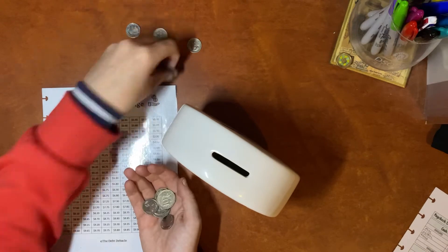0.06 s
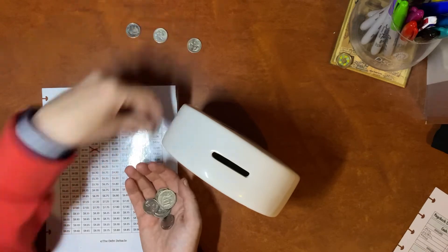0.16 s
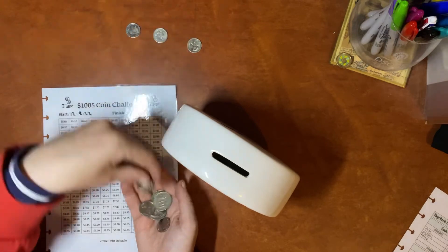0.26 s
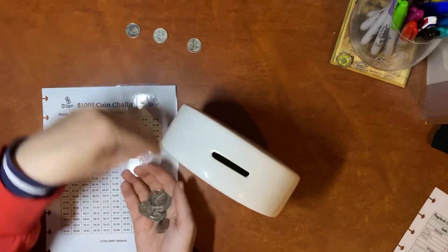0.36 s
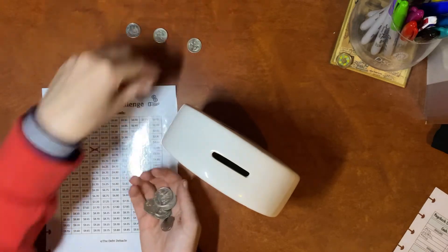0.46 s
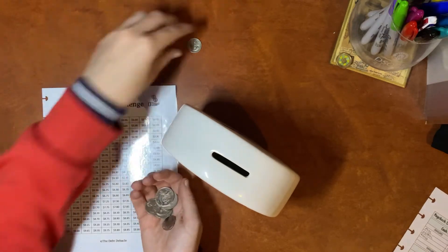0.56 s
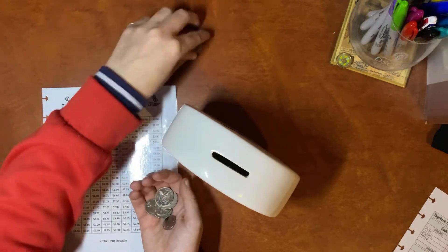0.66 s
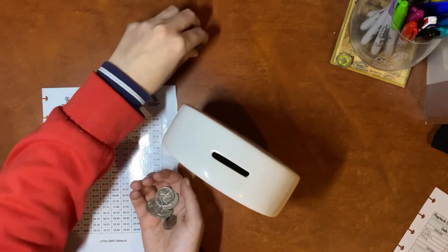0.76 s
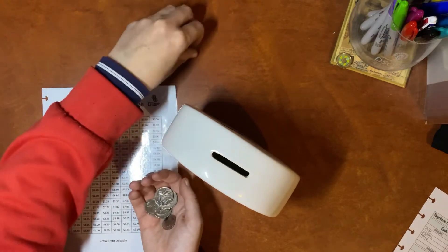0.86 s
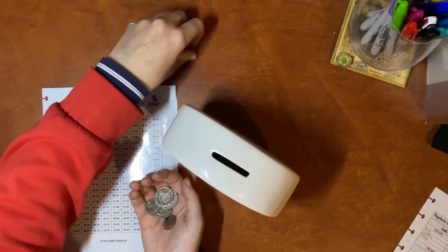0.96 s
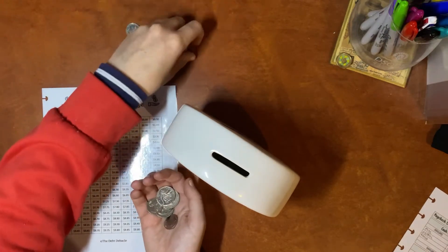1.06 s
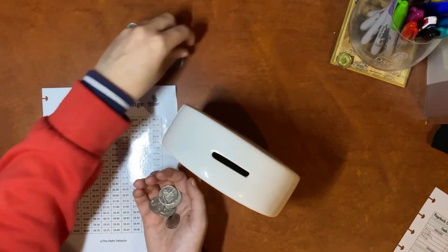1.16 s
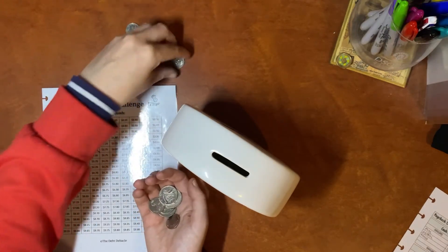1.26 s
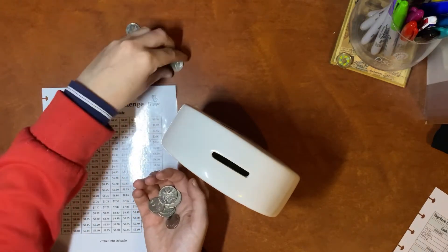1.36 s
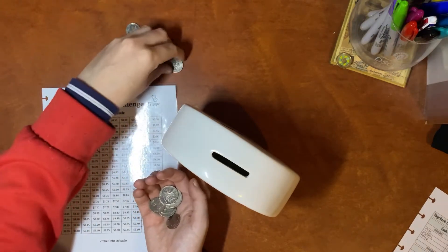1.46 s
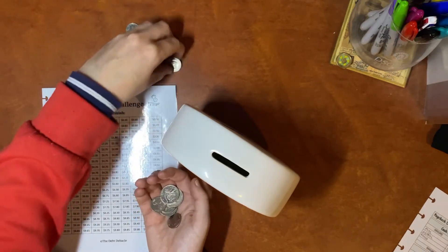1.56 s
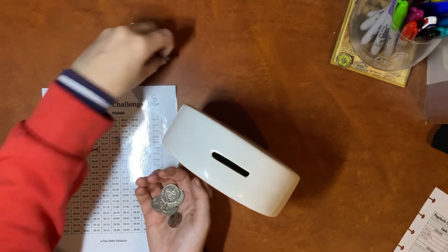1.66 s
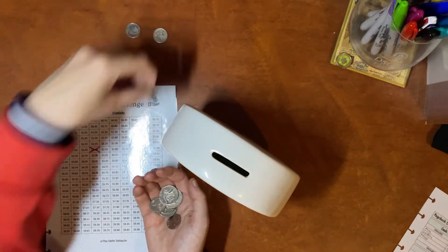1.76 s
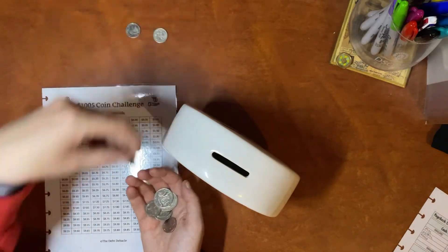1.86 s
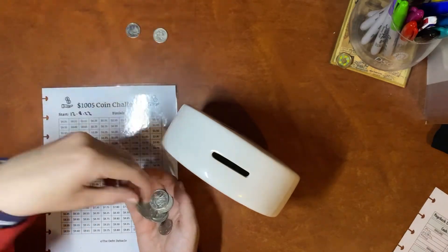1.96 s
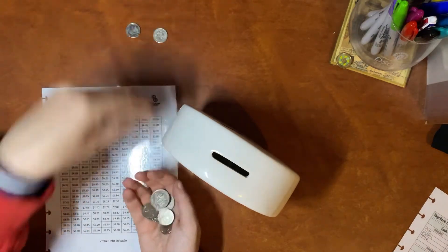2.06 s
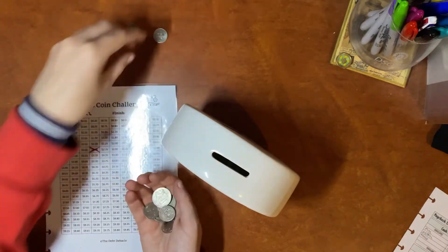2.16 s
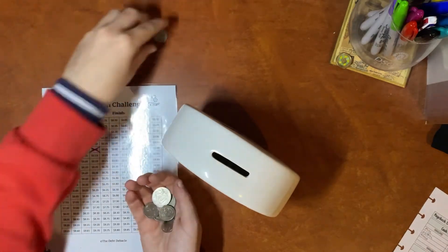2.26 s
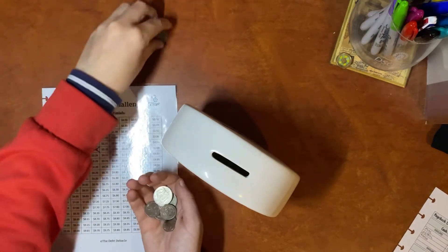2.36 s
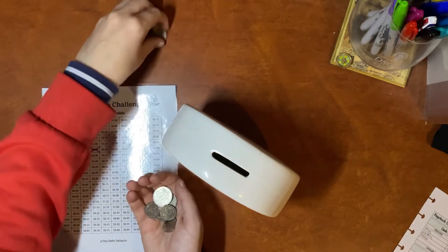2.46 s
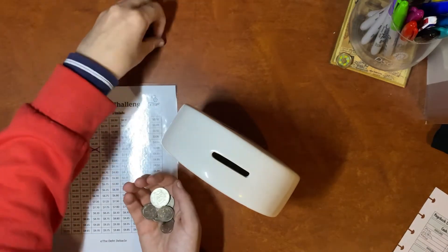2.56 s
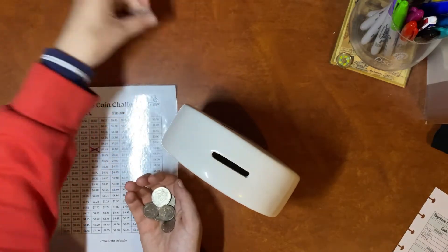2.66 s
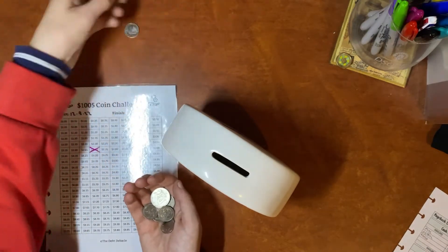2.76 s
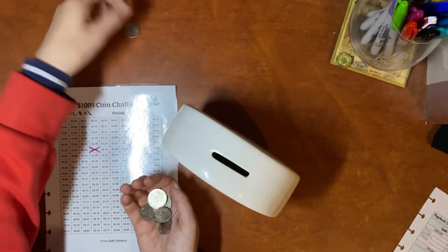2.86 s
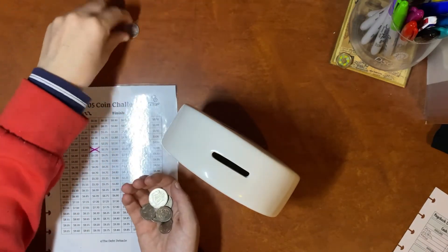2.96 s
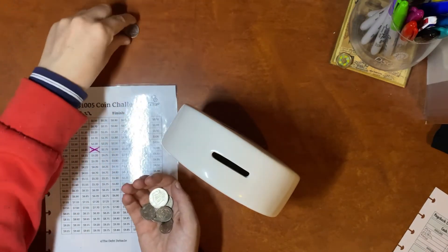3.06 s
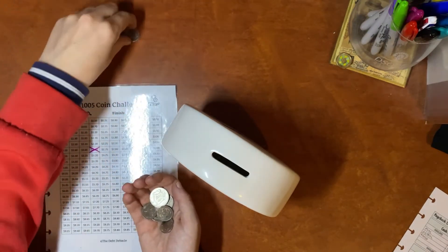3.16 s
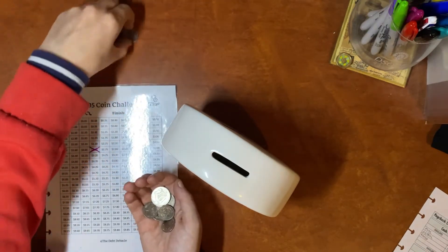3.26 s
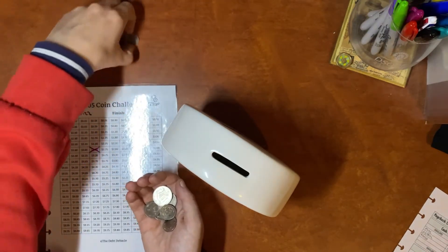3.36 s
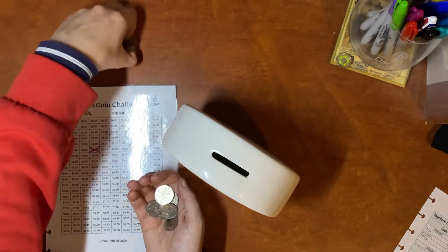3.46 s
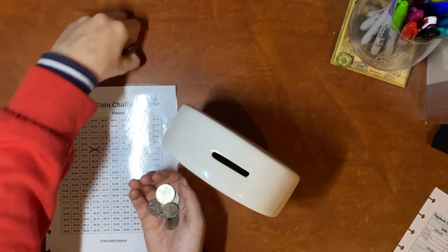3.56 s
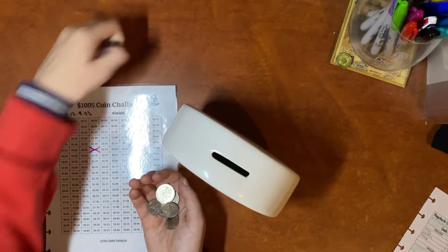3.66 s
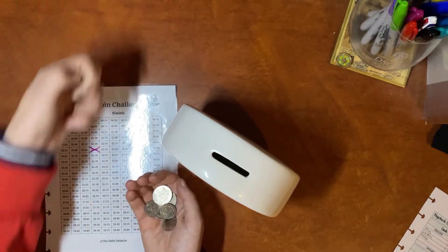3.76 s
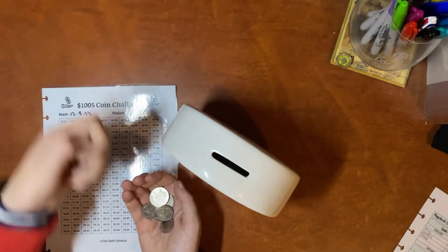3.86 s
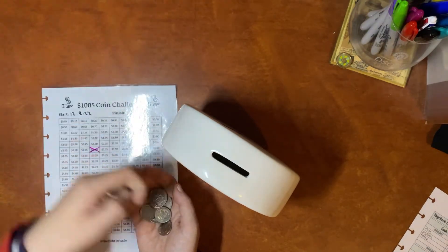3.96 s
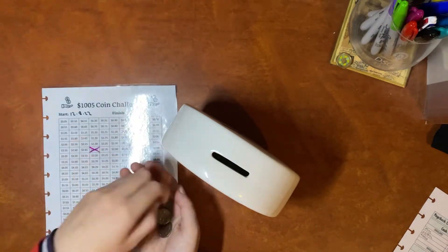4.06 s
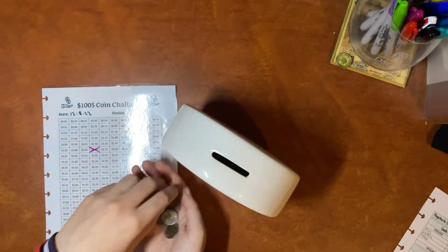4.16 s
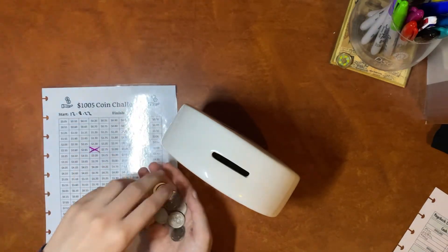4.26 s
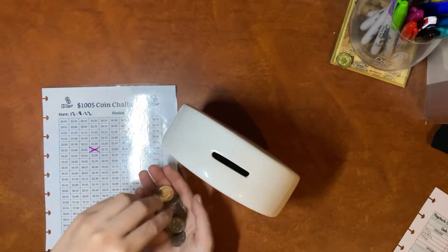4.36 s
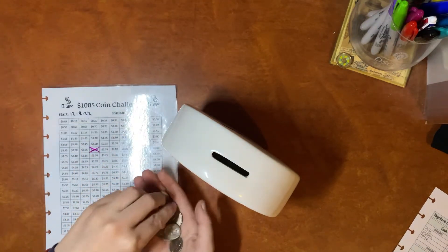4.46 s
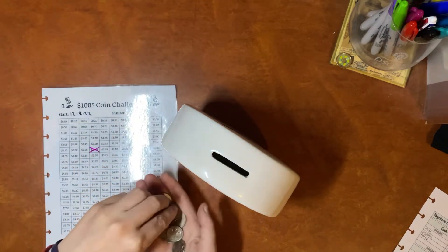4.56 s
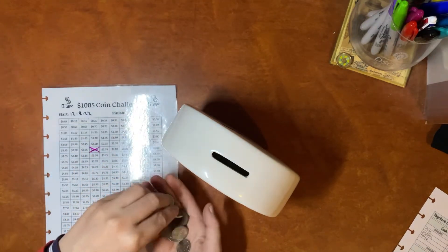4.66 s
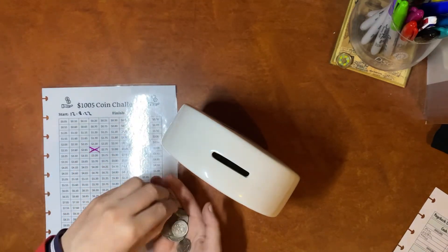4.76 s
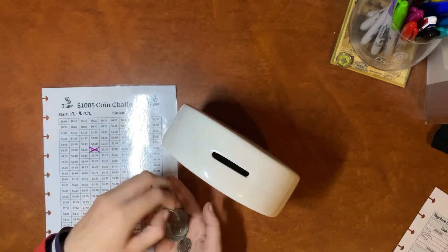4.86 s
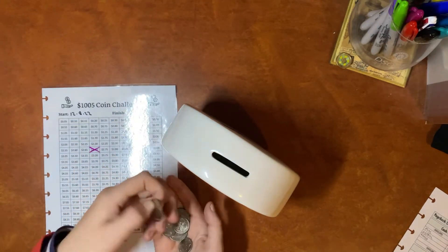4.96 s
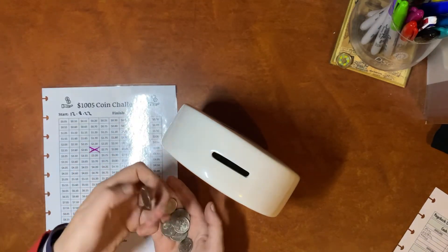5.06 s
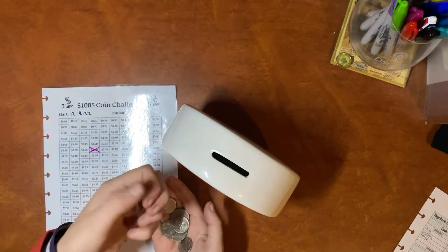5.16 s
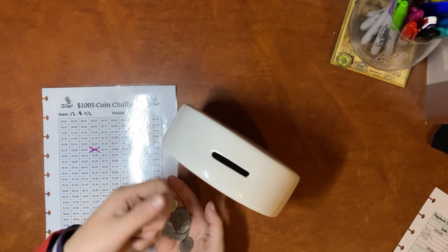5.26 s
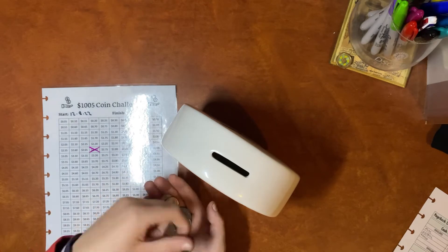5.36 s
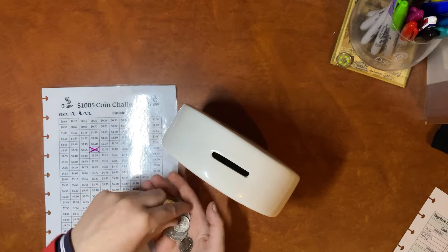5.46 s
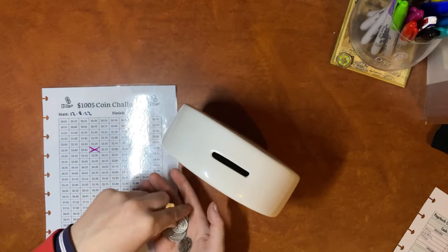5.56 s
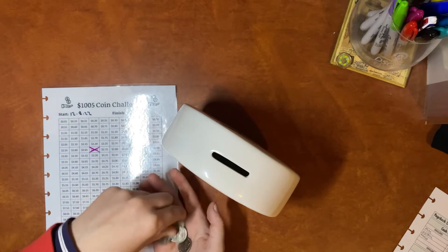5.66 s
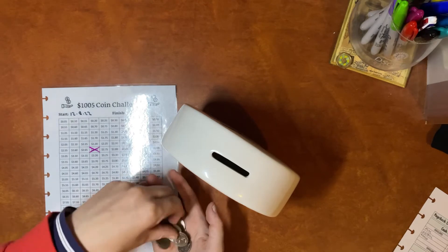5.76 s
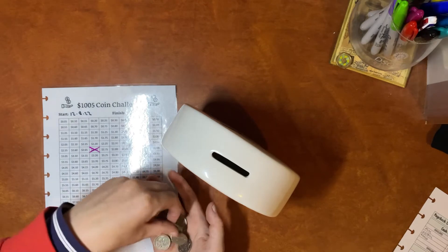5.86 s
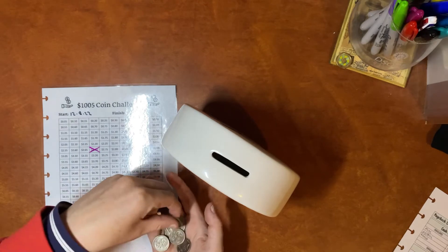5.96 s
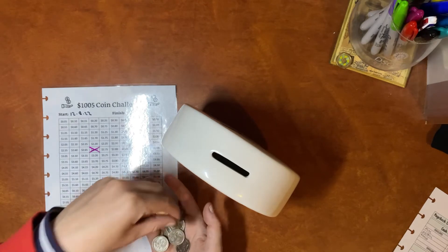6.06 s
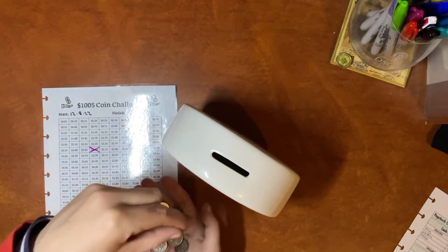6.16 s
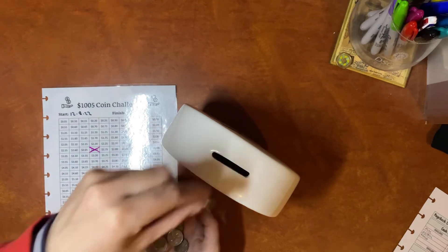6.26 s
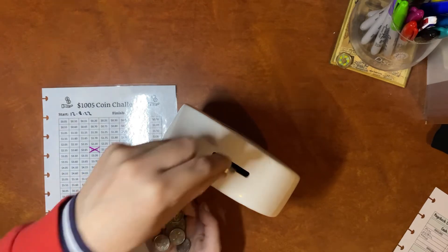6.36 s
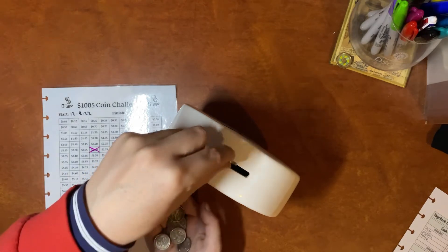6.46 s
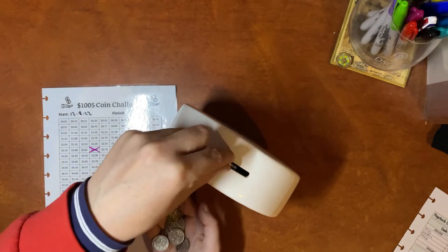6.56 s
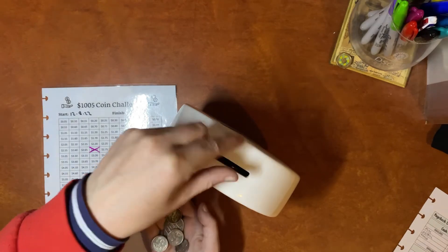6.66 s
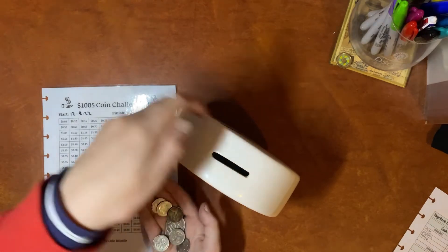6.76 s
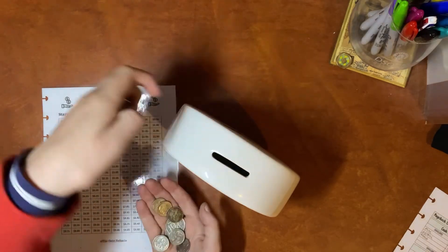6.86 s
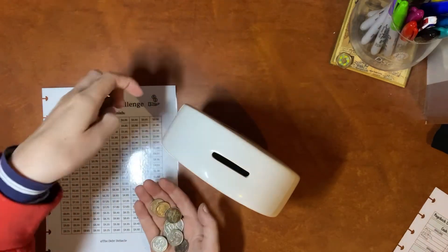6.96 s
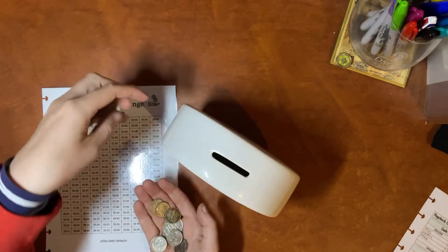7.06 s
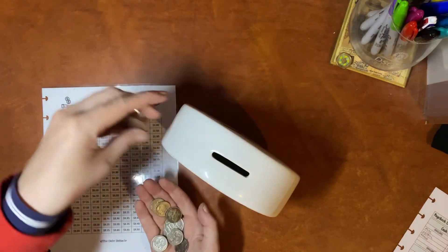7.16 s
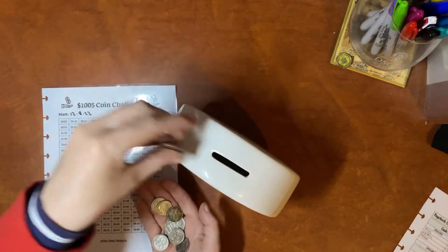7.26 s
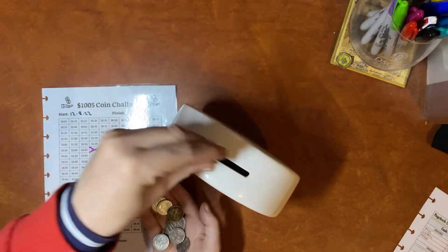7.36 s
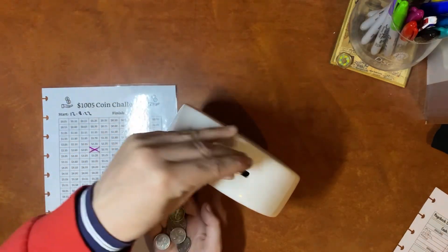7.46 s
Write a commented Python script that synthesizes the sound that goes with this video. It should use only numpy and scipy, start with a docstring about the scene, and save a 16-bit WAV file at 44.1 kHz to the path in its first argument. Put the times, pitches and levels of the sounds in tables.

```python
"""Coins are slid off a wooden table one by one and dropped on a pile in a cupped hand, in a small room.
Each touch is a hard click, its chatter and a short metallic ring; sliding is a rain of tiny slips.
Fingers bump the tabletop and wake its low modes; skin and sleeve rub as the hand moves.
At last one coin knocks at the slot of a money box, falls in and bounces on the coins inside;
each knock also rings the modes of the box's shell and passes into the table."""
import sys
import numpy as np
from scipy import signal
from scipy.fft import rfft, irfft, next_fast_len
from scipy.io import wavfile
from scipy.ndimage import uniform_filter1d

SR = 44100
rng = np.random.default_rng(int(sys.argv[2]) if len(sys.argv) > 2 else 0)


def output_pcm(signal):
    """Save a mono or channel-first signal as 16-bit PCM at the path in sys.argv[1].

    Samples are clipped to [-1, 1] before scaling.
    """
    pcm = np.clip(np.atleast_2d(signal).T, -1, 1) * 32767
    wavfile.write(sys.argv[1], SR, np.round(pcm).astype(np.int16))


N = 331632
TIME = np.arange(N) / SR

# coin against the money box and its contents: start_s, level_db, treble_db, bass_db, chatter_t60_s
KNOCKS = [(6.433, 7, -11.5, -1, 0.03), (6.6014, -9, -6, -5, 0.086), (6.6116, -9, -24.5, -2, 0.044),
          (6.7238, -1, 1.5, 7, 0.062), (6.7386, 5.5, 4, 8, 0.088), (6.783, -7.5, 14, 13.5, 0.26),
          (6.8098, 7.5, -6.5, 0.5, 0.055), (6.8473, 2.5, 2, 1.5, 0.19), (6.9085, -12, -35, 7, 0.033),
          (6.9238, 2, 1, 0, 0.009), (7.0189, -25, -14, 5, 0.054)]


def from_db(db):
    """Decibels to gain."""
    return 10 ** (np.asarray(db) / 20)


def at_hz(points, hz):
    """Read a table on a log-frequency axis."""
    f, value = np.transpose(points)
    return np.interp(np.log(np.maximum(hz, 1)), np.log(f), value)


def bins(size):
    """Frequencies of a real FFT in Hz."""
    return np.arange(size // 2 + 1) * SR / size


def add(track, s, sound):
    """Mix a sound in at a time in seconds."""
    start = max(0, round(s * SR))
    track[start:start + len(sound)] += sound[:max(0, N - start)]


def coloured(x, colour):
    """Give a noise a spectrum; rms 1."""
    size = next_fast_len(N)
    gain = from_db(at_hz(colour, bins(size)))
    y = irfft(rfft(x, size) * gain, size)[..., :N]
    return y / np.std(y)


def ring(force, hz, t60):
    """One mode: a unit click sets a damped sine of height 1 ringing."""
    decay = from_db(-60 / (t60 * SR))   # per sample
    w = 2 * np.pi * hz / SR
    # the tiny offset keeps the resonator clear of vanishingly small numbers
    return signal.lfilter([0, np.sin(w)], [1, -2 * decay * np.cos(w), decay * decay], force + 1e-18)


def diffuse(size):
    """Stereo white noise from all sides: the ears agree more or less at each frequency."""
    # likeness of left and right: pitch_hz, correlation (0 to 1)
    room_likeness = [(120, .95), (300, .15), (1200, .05), (4500, .3), (9000, .3), (11500, .97)]
    mid, side = rfft(rng.standard_normal((2, size)))
    alike = np.clip(at_hz(room_likeness, bins(size)), 0, 1)
    common = np.sqrt((1 + alike) / 2) * mid
    opposed = np.sqrt((1 - alike) / 2) * side * [[1], [-1]]
    return irfft(common + opposed, size)


def partials(t, t60, count=13):
    """Damped partials of the coins in contact, spread over two octaves, new for each touch; energy 1."""
    hz = 3600 * 4 ** ((np.arange(count) + rng.random(count)) / count)
    tones = np.sin(2 * np.pi * hz[:, None] * t).sum(axis=0) * from_db(-60 * t / t60)
    return tones / np.linalg.norm(tones)


def contact(colour, level_db, treble_db, bass_db, t60, snap, metal_db, metal_t60, size=4096):
    """A hard click, its dying chatter of tiny rebounds and a short metallic ring, through one body.

    The level is the energy at 3-8 kHz."""
    hz, t = bins(size), np.arange(size) / SR
    force = rng.standard_normal(size) * from_db(-60 * t / max(t60, 1e-3))   # chatter
    force[0] = snap
    force = force + from_db(metal_db) * np.linalg.norm(force) * partials(t, metal_t60)
    tilt = [(1800, bass_db), (3500, 0), (7500, 0), (11000, treble_db)]
    gain = from_db(at_hz(colour, hz) + at_hz(tilt, hz)) * (hz + 1) / (hz + 150)   # thin lows
    # minimum phase: the body answers after the touch, never ahead of it
    cepstrum = irfft(np.log(gain))
    fold = np.r_[1, np.full(size // 2 - 1, 2), 1, np.zeros(size // 2 - 1)]
    body = np.exp(rfft(cepstrum * fold))
    sound = rfft(force) * body
    energy = np.sum(np.abs(sound[(hz > 3000) & (hz < 8000)]) ** 2) * 2 / size
    return from_db(level_db) * irfft(sound) / np.sqrt(energy)


def friction(colour, per_s, spread_db, wander_db, size=256):
    """Tiny uneven slips at random moments; resonances come and go as the contact point moves; rms 1."""
    slips = (rng.random(N) < per_s / SR) * rng.standard_normal(N)
    uneven = slips * from_db(spread_db * np.minimum(rng.exponential(1, N), 4))
    frames = signal.stft(uneven, nperseg=size)[2]
    wander = rng.standard_normal(frames.shape)
    for _ in range(2):   # smooth over neighbouring pitches, then over time
        wander = uniform_filter1d(wander, size=3, axis=0)
        wander = uniform_filter1d(wander, size=10, axis=1)
    wandering = frames * from_db(wander_db * wander / np.std(wander))
    return coloured(signal.istft(wandering)[1][:N], colour)


def strokes(rows, swell_db, stop_t60):
    """Gain of sliding strokes: each sets in quickly, swells as it gathers speed, then dies away."""
    power = np.zeros(N)
    for stop_s, length_s, peak_db in rows:
        t = np.arange(round((length_s + stop_t60) * SR)) / SR
        swell = swell_db * np.maximum(1 - t / length_s, 0)
        dying = 60 * np.maximum(t - length_s, 0) / stop_t60
        onset = 1 - np.exp(-t / 0.0066)
        add(power, stop_s - length_s, (from_db(peak_db - swell - dying) * onset) ** 2)
    return np.sqrt(power)


def room_tail(room_db, size):
    """Diffuse noise dying at its own rate in each band, with one stronger patch of wall echoes."""
    # decay of the room: pitch_hz, t60_s
    room_t60 = [(1000, 0.25), (5000, 0.14), (14000, .18)]
    echo_s, echo_width_s, echo_db = 0.1, 0.0079, 0.5   # the nearest walls answer together
    t, hz, noise = np.arange(size) / SR, bins(size), rfft(diffuse(size))
    centres = np.array(room_t60)[:, 0]
    tail = 0
    for share, (_, t60) in zip(np.eye(len(centres)), room_t60):
        band = irfft(noise * at_hz(np.c_[centres, share], hz))
        tail = tail + band * from_db(-60 * t / t60)
    onset = 1 - np.exp(-t / 0.00033)
    tail = tail * onset * from_db(echo_db * np.exp(-((t - echo_s) / echo_width_s) ** 2))
    return tail * from_db(room_db) / np.sqrt(np.sum(tail ** 2) / 2)


def heard(x, side, lag_s, room_db, size=16384):
    """Direct sound, right microphone first, together with the room's tail."""
    tail = room_tail(room_db, size)
    padded = next_fast_len(N + size)
    hz, ears = bins(padded), np.array([[1], [-1]])
    lag = lag_s * np.interp(hz, [9000, 11500], [1, 0])   # no lag in the top octave
    balance = from_db(ears * at_hz(side, hz) / 2)
    balance = balance / np.sqrt(np.mean(balance ** 2, axis=0))
    direct = np.exp(-1j * np.pi * hz * lag * ears)
    return irfft(rfft(x, padded) * balance * (direct + rfft(tail, padded)), padded)[:, :N]


def room_air():
    """The room's own hum and hiss: steady diffuse noise, weighted to the bass."""
    # spectrum of the air: pitch_hz, density_db (dB per Hz)
    air_colour = [(26, -33.5), (45, 8), (114, -3), (228, -17), (306, -14), (741, -22), (902, -19),
                  (1340, -31.5), (2940, -39.5), (4800, -35), (7470, -50.5), (9320, -42), (16000, -71)]
    return from_db(-60) * coloured(diffuse(next_fast_len(N)), air_colour)


def tabletop():
    """Soft blows wake the board's low modes; the longer the contact, the duller the thud."""
    # fingers, a coin or the rocking box bump the tabletop: start_s, level_db, contact_ms
    bumps = [(.006, -42, 0.24), (2.542, -46.5, 0.78), (2.994, -44.5, 4.2), (3.353, -43.5, 0.52),
             (3.438, -34.5, 0.22), (6.752, -25.5, 0.78)]
    # the hand lands to take a coin, one finger and then the next: start_s, level_db
    landings = [(.627, -35.5), (1.207, -41.5), (2.311, -42.5)]
    # modes of the board: pitch_hz, level_db, t60_s
    table_modes = [(79, -8, 0.043), (108, 0.5, 0.034), (112.7, 0.5, 0.22), (159, -10, 0.21),
                   (227.9, 1, 0.019), (321.8, -1.5, 0.098), (470, -19, 0.11)]
    finger_gap_s, finger_contact_ms = 0.02715, 1.47
    # each knock passes through the box into the table, the more so the harder and heavier it is
    box_thud_db, follows_level, follows_bass, box_contact_ms = -43, 0.38, 1, 0.94
    blows = list(bumps)
    for s, level_db in landings:
        for delay_s in (0, finger_gap_s):
            blows.append((s + delay_s, level_db, finger_contact_ms))
    for s, level_db, _, bass_db, _ in KNOCKS:
        thud_db = box_thud_db + follows_level * level_db + follows_bass * bass_db
        blows.append((s, thud_db, box_contact_ms))

    force, t = np.zeros(N), TIME[:SR // 20]
    main_hz = table_modes[2][0]
    for s, level_db, contact_ms in blows:
        push = t * np.exp(-1000 * t / contact_ms)
        at_main_mode = abs(np.sum(push * np.exp(2j * np.pi * main_hz * t)))
        add(force, s, from_db(level_db) * push / at_main_mode)
    return sum(from_db(db) * ring(force, hz, t60) for hz, db, t60 in table_modes)


def table_coins():
    """A coin grates over the grain in fits, then its rim taps the wood as it is lifted."""
    # a coin's edge tips and taps on the wood: start_s, level_db, treble_db, bass_db, chatter_t60_s
    taps = [(0.008, -51.5, 24, 18, 0.037), (1.0409, -13.5, 16.5, -9.5, 0.027),
            (1.347, -42.5, -9.5, 19, 0.016), (1.5831, -22, 4, 8, 0.06), (2.3806, -31, -8.5, -1.5, 0.0099),
            (2.5361, -20, -41, 10, 0.038), (3.1553, -34.5, -36, 3.5, 0.027), (3.4348, -25, -10, 4.5, 0.038)]
    # spectrum of a tap: pitch_hz, level_db
    tap_colour = [(300, -5.5), (800, -7), (1400, -13), (2200, 1.5), (2800, -4.5), (4200, 0.5), (6000, -13),
                  (8500, -13.5), (12000, -35.5), (16000, -37)]
    # a coin is pulled over the wood, gathers speed and sticks: stop_s, length_s, peak_db
    drags = [(.69, 0.052, -56.5), (.795, 0.096, -48.5), (.838, 0.049, -38.5), (.958, 0.094, -34),
             (1.284, 0.024, -55), (1.355, 0.052, -47.5), (1.587, 0.016, -36), (2.348, 0.017, -59),
             (2.5, .13, -64.5), (2.536, 0.02, -38.5), (3.08, 0.031, -53), (3.105, 0.019, -52),
             (3.255, 0.065, -54), (3.338, 0.09, -57.5), (3.43, 0.047, -66)]
    # spectrum of the scrape: pitch_hz, level_db
    drag_colour = [(300, -5.5), (700, -5.5), (1100, -2.5), (1600, -6.5), (2700, 0), (4200, 3), (7000, -13),
                   (10000, -22.5), (15000, -47)]
    out = np.zeros(N)
    for s, level_db, treble_db, bass_db, t60 in taps:
        tap = contact(tap_colour, level_db, treble_db, bass_db, t60,
                      snap=0.66, metal_db=-10.5, metal_t60=0.022)
        add(out, s, tap)
    sliding = strokes(drags, swell_db=20, stop_t60=0.029)
    return out + sliding * friction(drag_colour, per_s=3000, spread_db=2.8, wander_db=3.5)


def hand():
    """Skin rubs dully on skin; the sleeve swishes over paper and wood, each as loud as the move is fast."""
    # moves of the hand: fastest_s, length_s, rub_db (dull), swish_db (bright)
    moves = [(.01, 0.04, -50.5, -70), (1.674, 0.36, -65.5, -104), (2.304, 0.46, -64.5, -79.5),
             (2.83, 0.17, -64.5, -82), (3.158, .45, -60.5, -80.5), (3.69, .2, -57.5, -62.5),
             (4.172, 0.2, -51, -62), (4.507, 0.36, -57.5, -68.5), (5.245, 0.39, -68, -97),
             (5.48, 0.17, -60, -94), (5.915, 0.11, -48, -48), (6.19, 0.43, -56, -61.5),
             (7.02, 0.16, -52, -71), (7.312, 0.3, -63.5, -83)]
    # spectrum of the dull rub: pitch_hz, level_db
    rub_colour = [(60, 15.5), (120, 7.5), (220, 6), (400, 6), (750, 3.5), (1300, -10.5), (2500, -12),
                  (6000, -44.5)]
    # spectrum of the bright swish: pitch_hz, density_db (dB per Hz)
    swish_colour = [(600, -6.5), (1600, 4), (3000, -1.5), (5000, 1), (7500, -8.5), (10000, -9.5),
                    (15000, -33)]
    rise, slope_db = 0.3, 13   # share of the length spent speeding up; drop at either end
    rub, swish = 0, 0
    for s, length_s, rub_db, swish_db in moves:
        phase = (TIME - s) / length_s
        speed = from_db(-slope_db * np.maximum(-phase / rise, phase / (1 - rise)))
        rub = np.maximum(rub, from_db(rub_db) * speed)
        swish = np.maximum(swish, from_db(swish_db) * speed)
    skin = rub * friction(rub_colour, per_s=2700, spread_db=1.0, wander_db=4.0)
    sleeve = swish * friction(swish_colour, per_s=5800, spread_db=3.5, wander_db=0.0)
    return skin + sleeve


def palm_coins():
    """Coins damped by the hand click and slide; now and then one rings freely, or the box is brushed."""
    # coin on coin in the palm: start_s, level_db, treble_db
    clinks = [(0.186, -41, -2), (0.3062, 2.5, 4.5), (0.3273, -2.5, 12.5), (0.3338, -12.5, 11),
              (2.0192, -0.5, 5.5), (2.030, -1, 8.5), (2.073, -14.5, 6), (2.182, -30, 2.5),
              (3.934, -34, 17.5), (4.0637, 1.5, -2.5), (4.1103, -10.5, 0), (4.2301, -11.5, 2.5),
              (4.27, -18.5, 0), (4.417, -18, 2.5), (4.564, -21.5, -2.5), (4.622, -13.5, 4),
              (4.65, -12.5, 4.5), (4.796, -24, 12.5), (4.813, -23.5, 0.5), (5.424, -22.5, 3),
              (5.452, -28.5, 5), (5.568, -24, 8), (5.6322, -21.5, -2.5), (5.6805, -18.5, 3),
              (5.708, -16, 9.5), (5.7362, -17.5, 1.5), (5.7847, -19, 9.5), (5.888, -10.5, 6.5),
              (5.9934, -13, 9)]
    # spectrum of a clink: pitch_hz, level_db
    clink_colour = [(400, -16.5), (1000, -28.5), (2000, -16), (3000, -10.5), (4000, 8.5), (5200, 4),
                    (7000, 4), (9000, -2), (12000, -2.5), (14000, -4.5), (16000, -20)]
    # a hard hit rests at once; a gentler one chatters on, the merest touch less: level_db, chatter_t60_s
    chatter = [(-13.5, 0.047), (-12, 0.087), (11.5, 0.006), (-4, 0.002)]
    # free rings: start_s, what rings, level_db
    rings = [(.3335, "small coin", -28.5), (1.042, "lifted coin", -45), (2.029, "small coin", -30),
             (4.064, "middle coin", -23), (4.231, "middle coin", -43.5), (4.655, "brushed box", -55),
             (4.658, "thick coin", -40.5), (4.796, "middle coin", -47.5), (5.28, "brushed box", -57),
             (5.889, "thick coin", -28.5), (6.611, "coin in slot", -42)]
    # what rings on when nothing damps it, by name: pitch_hz, level_db
    free_modes = {"small coin": [(10690, 0), (10815, -3)], "middle coin": [(9255, 0), (13005, -6)],
                  "thick coin": [(11475, 0), (11215, -9), (9425, -7)], "lifted coin": [(2750, 0)],
                  "coin in slot": [(3290, 0), (10760, -6)], "brushed box": [(904, 0)]}
    # the fingers push coins over each other in the palm: stop_s, length_s, peak_db
    shuffles = [(3.93, 0.035, -65), (4.44, 0.038, -54), (4.66, 0.14, -55), (4.99, 0.046, -63.5),
                (5.58, 0.028, -50), (5.86, 0.16, -51), (6.035, 0.45, -66)]
    out = np.zeros(N)
    for s, level_db, treble_db in clinks:
        # the duller clinks come from the larger, lower coins
        pitch = 2 ** (0.035 * np.clip(treble_db, -10, 10))
        t60 = np.interp(level_db, *np.transpose(chatter))
        clink = contact(np.array(clink_colour) * [pitch, 1], level_db, treble_db, 0, t60,
                        snap=0.43, metal_db=-18.5, metal_t60=0.06)
        add(out, s, clink)
    t, ring_t60_s = TIME[:SR // 2], 0.16
    for s, name, level_db in rings:
        for hz, db in free_modes[name]:
            add(out, s, from_db(level_db + db - 60 * t / ring_t60_s) * np.sin(2 * np.pi * hz * t))
    sliding = strokes(shuffles, swell_db=3.5, stop_t60=0.36)
    return out + sliding * friction(clink_colour, per_s=2400, spread_db=2.0, wander_db=-2.0)


def money_box():
    """Each knock clicks and sets the shell ringing, every mode with a strength of its own."""
    # spectrum of a knock: pitch_hz, level_db
    knock_colour = [(280, 3), (400, -6.5), (550, -3.5), (1000, -7.5), (1500, -24), (2300, -20),
                    (3100, -9.5), (4000, 0.5), (4900, 2), (6000, -5), (8000, -3), (10000, -6.5),
                    (11500, -20.5), (13500, -12.5), (16000, -21)]
    # modes of the shell: pitch_hz, level_db
    box_modes = [(250, -16), (470, -15), (535, -16), (670, -16), (1120, -16), (1656, -16), (1686, -16),
                 (1916, -21), (2145, -11), (2848, -5), (3045, -11), (3287, -4), (3715, -5), (3768, -5),
                 (3857, -5), (3997, -4), (4260, -8), (4764, -1), (5106, -6), (6950, -8), (9747, -13)]
    box_t60_s, shell_db = 0.072, -35.5
    out, pushes = np.zeros(N), np.zeros((len(box_modes), N))
    mode_hz = np.array(box_modes)[:, 0]
    for s, level_db, treble_db, bass_db, t60 in KNOCKS:
        knock = contact(knock_colour, level_db, treble_db, bass_db, t60,
                        snap=0.44, metal_db=-1.5, metal_t60=0.024)
        add(out, s, knock)
        # a heavy knock favours the low modes
        strength_db = level_db + bass_db * (mode_hz < 3200) + rng.normal(0, 2.5, len(mode_hz))
        pushes[:, round(s * SR)] = from_db(strength_db) * rng.choice([-1, 1], len(mode_hz))
    shell = sum(from_db(db) * ring(push, hz, box_t60_s) for push, (hz, db) in zip(pushes, box_modes))
    return out + from_db(shell_db) * shell


def scene():
    """Palm, table and money box in one room, over its air."""
    # how palm and box reach the two microphones: pitch_hz, left_minus_right_db
    near_side = [(800, -0.5), (2400, -2.5), (4300, -9.5), (8000, -4), (12000, 1)]
    # the same for the table and the moving hand: pitch_hz, left_minus_right_db
    table_side = [(700, 1), (4300, -6), (8000, -3.5)]
    lag_s = 4.2e-5   # left after right
    palm = heard(palm_coins(), near_side, lag_s, room_db=-8)
    box = heard(money_box(), near_side, lag_s, room_db=-2.0)
    table = heard(table_coins() + hand() + tabletop(), table_side, lag_s, room_db=-2.5)
    return palm + box + table + room_air()


def record(dry):
    """The microphones drop the deep bass, which makes thuds sink in pitch; the top is cut steeply."""
    low_cut = signal.butter(5, 52, "high", fs=SR, output="sos")   # Hz
    top_cut = signal.ellip(10, .2, 80, 16200, fs=SR, output="sos")   # ripple dB, stop dB, Hz
    thinned = signal.sosfilt(low_cut, dry)
    return signal.sosfilt(top_cut, thinned)


dry = scene()
out = record(dry)
output_pcm(out)
```